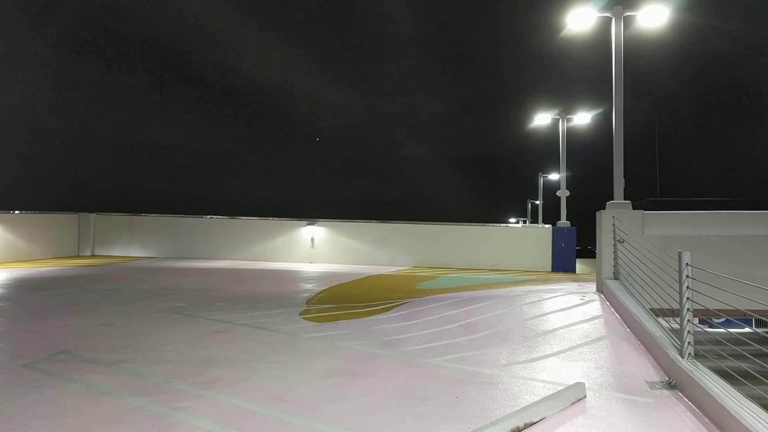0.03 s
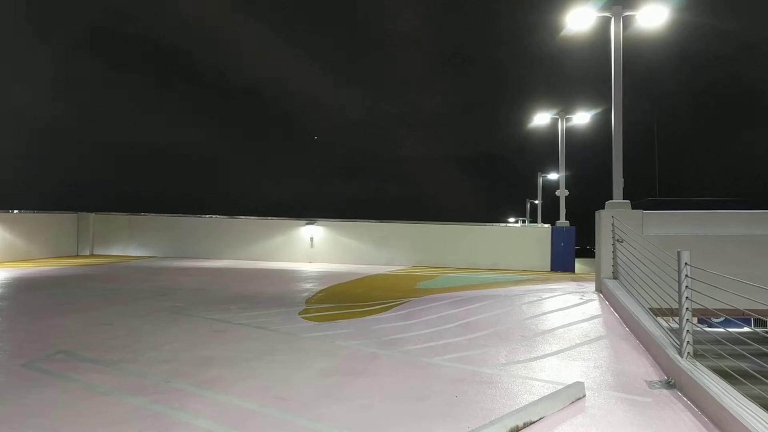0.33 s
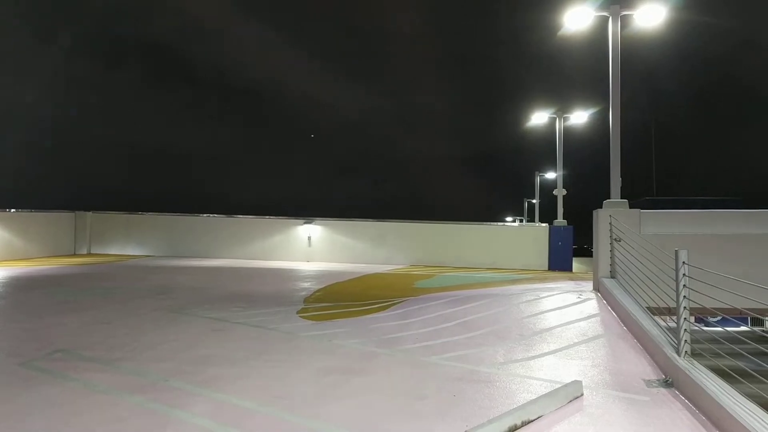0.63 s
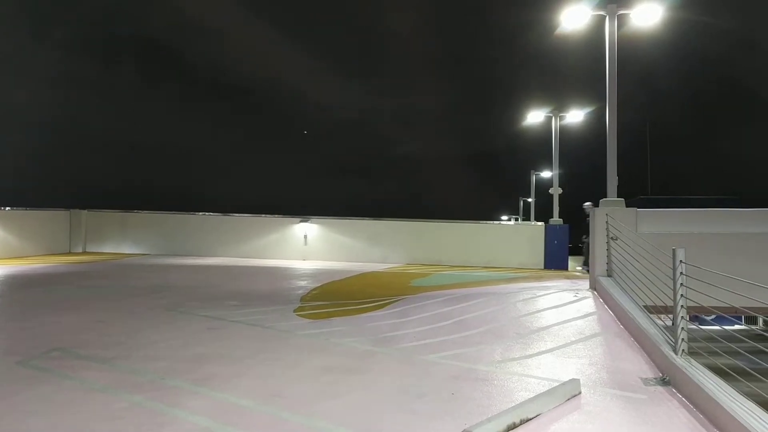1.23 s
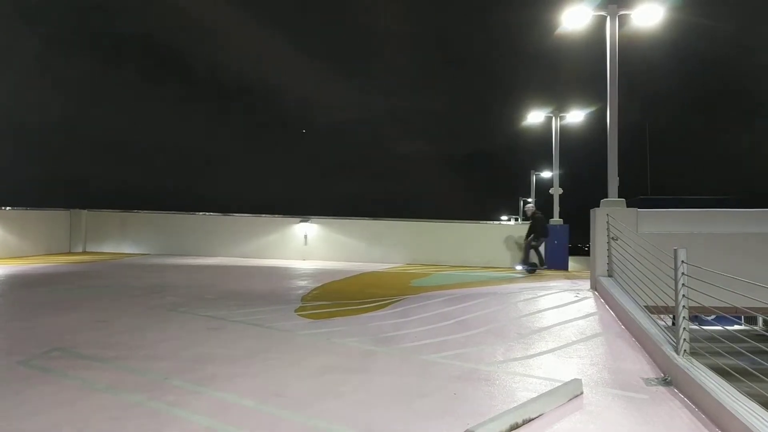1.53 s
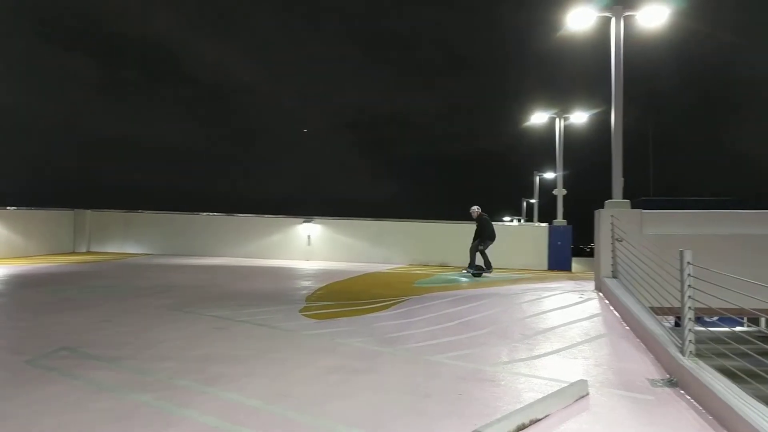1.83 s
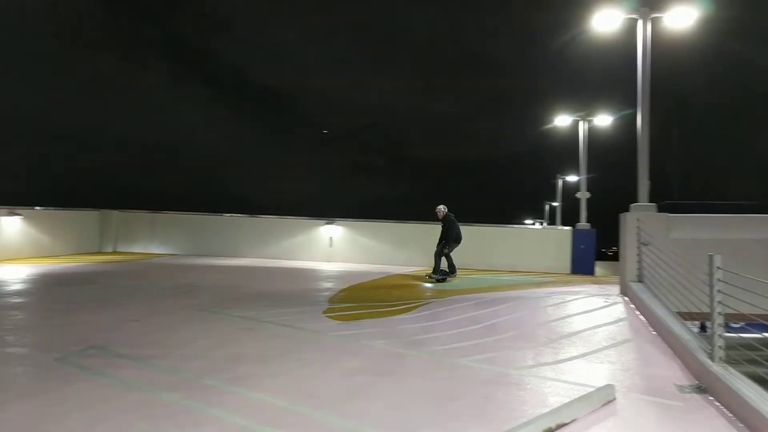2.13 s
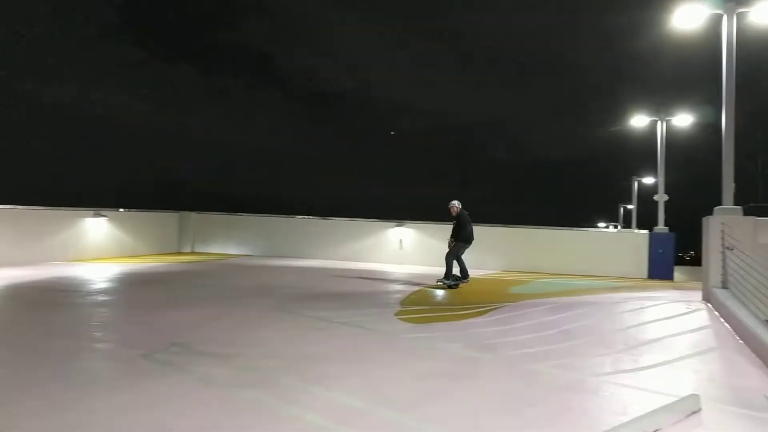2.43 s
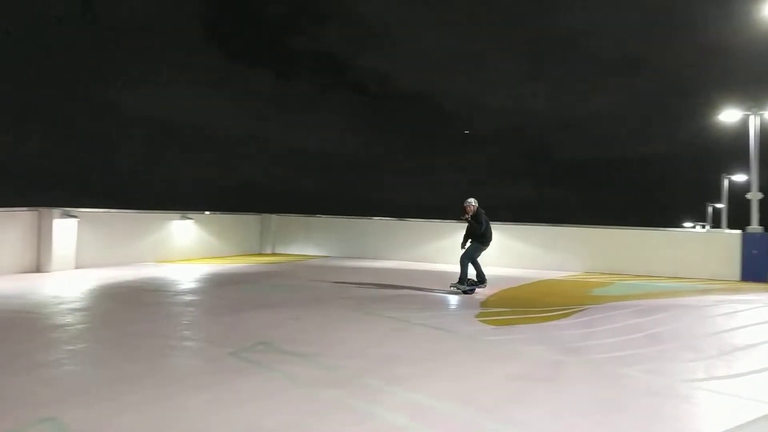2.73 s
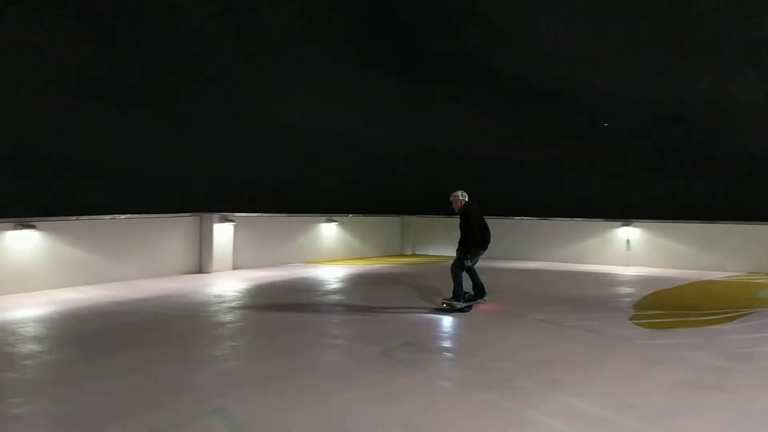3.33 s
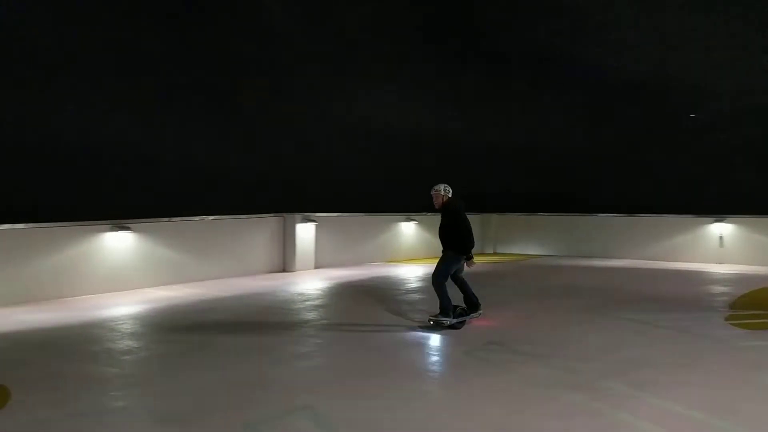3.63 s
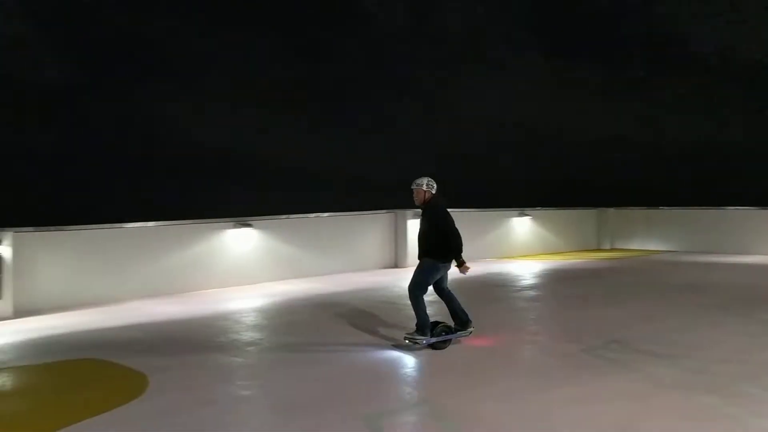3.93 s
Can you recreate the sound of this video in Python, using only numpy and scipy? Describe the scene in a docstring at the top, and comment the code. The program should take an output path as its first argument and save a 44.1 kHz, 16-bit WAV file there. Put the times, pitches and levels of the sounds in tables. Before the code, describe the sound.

Wind rumbles on the microphone while an electric skateboard rolls faintly closer over concrete.

```python
"""Wind rumbles right on the microphone, in soft buffets and a few sharp flaps, at night on an open
concrete parking deck. Behind it a rider on an electric board rolls closer from the far wall: the roar
of rubber on concrete grows and brightens, with a fine tread patter, crackles and scrapes of grit and a
thin motor whine. Far off lie a wash of traffic and faint steady whistles."""
import sys
import numpy as np
from scipy import signal
from scipy.io import wavfile
from scipy.ndimage import uniform_filter1d

SR = 44100
rng = np.random.default_rng(int(sys.argv[2]) if len(sys.argv) > 2 else 0)


def master_out(mix):
    """Clip the mix to full scale and print it as 16-bit PCM to the path in sys.argv[1]."""
    frames = np.transpose(np.atleast_2d(mix))
    ceiling = np.clip(frames, -1, 1)
    pcm = np.round(ceiling * 32767).astype(np.int16)
    wavfile.write(sys.argv[1], SR, pcm)


N = 176400
T = np.arange(N) / SR
LEAD_S = 1 / 8
EDDY_T = T[:SR // 4] - LEAD_S   # seconds from the middle of a buffet or flap


# Wind at the microphone. Each row: time in seconds, level in dB.
WIND_LEVEL = [(.12, -51), (.24, -39), (.48, -39.5), (.56, -35), (.70, -41), (.80, -39), (1.12, -32.5),
              (1.25, -39.5), (1.45, -36.5), (1.65, -35.5), (2.1, -34), (2.6, -34.5), (2.7, -31.5),
              (2.88, -37), (3.45, -35.5), (3.62, -27.5), (3.69, -44.5), (3.78, -32), (4.0, -39.5)]
# Its deep colour. Each row: frequency in Hz, level in dB per Hz.
WIND_SPECTRUM = [(22, -44.5), (32, -26.5), (45, -4), (62, 3), (110, -3), (190, -7), (300, -24.5),
                 (500, -27), (1000, -54.5)]

def rumble():
    """Air streams over the microphone: each band flutters, while their sum is evened out over 50 ms."""
    air = sum(band * from_db(2.5 * drift(22)) for _, band in noise_bands(WIND_SPECTRUM))
    power = uniform_filter1d(air ** 2, int(0.05 * SR)) + 1e-9
    return rms_one(air / np.sqrt(power)) * from_db(in_time(WIND_LEVEL))


# Eddies that hit the microphone. Each row: middle in seconds, relative level in dB, length in seconds,
# pitch of the thud in Hz.
EDDIES = [(0.246, -34, 0.042, 107), (0.282, -41, 0.032, 135), (0.541, -23.5, 0.049, 115.0),
          (0.598, -26.5, 0.051, 109.0), (0.65, -25.0, 0.033, 131), (0.725, -24.5, 0.017, 100),
          (0.802, -26.5, 0.064, 167.0), (0.868, -23, 0.018, 124.0), (0.918, -28, 0.021, 162),
          (0.999, -27, 0.028, 150), (1.033, -33.5, 0.073, 89.5), (1.119, -30, 0.078, 99),
          (1.328, -23.5, 0.022, 121.0), (1.37, -27.5, 0.022, 129), (1.654, -32, 0.018, 112),
          (1.828, -31, 0.021, 100), (1.905, -35, 0.043, 90), (2.067, -26.5, 0.039, 133),
          (2.246, -28.5, 0.032, 164), (2.339, -30, 0.024, 86), (2.556, -30.5, 0.036, 84),
          (2.701, -27, 0.033, 111), (2.8, -26.0, 0.022, 108.0), (2.929, -27.5, 0.033, 118),
          (3.016, -33, 0.053, 86.0), (3.104, -25.5, 0.022, 78), (3.271, -34, 0.051, 82.5),
          (3.42, -26.5, 0.019, 64), (3.513, -19.5, 0.017, 118), (3.565, -27.5, 0.032, 90),
          (3.605, -18.5, 0.024, 170), (3.743, -24, 0.018, 93), (3.824, -26, 0.015, 117)]
MIC_LOW_HZ, THUD_DB, THUD_CYCLES = 46.7, 8.5, 0.21

def buffets():
    """Each eddy is a puff of turbulence with a pressure pulse at its core."""
    out = np.zeros(N)
    for s, db, length_s, hz in EDDIES:
        air = puff(length_s, MIC_LOW_HZ, corner_hz=0.59 * hz, skirt_hz=299)
        eddy = rms_one(air + from_db(THUD_DB) * thud(hz)) * np.std(air)
        add(out, s - LEAD_S, from_db(db - 0.5) * eddy)
    return out


def puff(length_s, low_hz, corner_hz, skirt_hz):
    """A burst of turbulence on the microphone that rises faster than it falls."""
    slope_s = length_s * np.where(EDDY_T < 0, 0.62, 0.79)
    bell = 2 ** (-2 * (EDDY_T / slope_s) ** 2)
    air = cut(rng.standard_normal(len(EDDY_T)), low_hz, "high", order=3)
    air = cut(air, corner_hz, "low", order=1)
    air = cut(air, skirt_hz, "low", order=3)
    burst = cut(air * bell, 44, "high", order=3)
    return rms_one(burst) * np.sqrt(np.mean(bell ** 2))


def thud(hz):
    """One smooth push or pull on the microphone, ringing in its bass cut."""
    push = np.exp(-.5 * (EDDY_T * hz / THUD_CYCLES) ** 2)
    pulse = cut(push, MIC_LOW_HZ, "high", order=3)
    return rng.choice([-1, 1]) * pulse / np.abs(pulse).max()


# Sharp flaps of air on the microphone. Each row: middle in seconds, relative level in dB, half width
# of the pressure swing in seconds.
AIR_FLAPS = [(.606, -38, 0.00086), (.624, -27.5, 0.00077), (.637, -27, 0.0012), (.646, -28.5, 0.0012),
             (.721, -41, 0.00097), (.785, -31, 0.00051), (.792, -32.5, 0.0014), (.7975, -23.5, 0.00052),
             (.8005, -26, 0.00058), (.819, -29, 0.0018), (.911, -27, 0.00063), (.959, -32.5, 0.00069),
             (1.0, -25.5, 0.0011), (1.109, -31.5, .0009), (1.137, -36, 0.00086), (1.329, -27.5, 0.0013),
             (2.246, -27, 0.0016), (2.253, -23.5, 0.0009), (2.677, -31, 0.001), (2.797, -30, 0.0015),
             (3.595, -29.5, 0.00094), (3.602, -21.5, 0.00045), (3.62, -33, 0.0016)]

def flaps():
    """At the height of a gust, pressure snaps over to suction inside a small puff."""
    out = np.zeros(N)
    for s, db, half_width_s in AIR_FLAPS:
        widths = EDDY_T / half_width_s
        swing = -widths / (1 + (widths / 2) ** 2) ** 3
        snap = from_db(3) * swing / swing.max()
        air = from_db(-15) * puff(length_s=0.005, low_hz=225, corner_hz=446, skirt_hz=669)
        add(out, s - LEAD_S, from_db(db) * (snap + air))
    return out


# The tyre nears from the far wall; the roar dips briefly under the strongest gusts, around 0.55-0.9 s and at
# 3.6 s. Each row: time in seconds, relative level in dB.
APPROACH = [(.12, -59.5), (.25, -56), (.5, -56), (.56, -58), (.69, -59), (.76, -56), (.85, -59),
            (1.04, -55), (1.38, -56), (1.58, -53.5), (2.2, -52.5), (2.6, -52.5), (3.0, -51.5), (3.5, -50.5),
            (3.585, -52), (3.615, -55.5), (3.68, -54), (3.74, -52.5), (3.8, -52.5), (3.88, -51.5),
            (4.0, -49)]
# Its colour when the approach is at NEAR_DB. Each row: frequency in Hz, level in dB per Hz.
TYRE_SPECTRUM = [(150, -1.5), (350, 1.5), (600, 1), (1000, 2), (1300, -2.5), (1700, -2), (2400, -6.5),
                 (3300, -14.5), (5000, -23.5), (6500, -31), (8000, -36), (11000, -43), (14500, -39),
                 (16000, -38)]
NEAR_DB, TYRE_DB = -51.5, -47
BRIGHTENING = 0.51   # extra dB per octave for each dB that the board gains

def tyre(nearness_db):
    """Grainy roar of rubber on concrete, brighter as it nears the microphone."""
    grain_db = 0.93 * drift(35)
    roar = np.zeros(N)
    for hz, band in noise_bands(TYRE_SPECTRUM):
        octaves = np.clip(np.log2(hz / 860), -1, 1)
        roar += band * from_db(nearness_db * (1 + BRIGHTENING * octaves))
    return roar * from_db(TYRE_DB + grain_db)


# Grit scraping on the deck. Each row: start in seconds, level of the rasp in dB, decay in seconds,
# pitch of the rasp in Hz, treble hiss against the rasp in dB.
GRIT_SCRAPES = [(2.331, -67, .004, 7460, -5), (2.363, -56.5, .007, 6000, -18),
                (2.383, -63.5, 0.011, 7960, -22), (2.481, -74, .003, 9000, -3),
                (2.515, -55.5, .0025, 4900, -11), (2.540, -69, .003, 7500, -12),
                (2.667, -66, .003, 5500, -10), (3.052, -65.5, .005, 6500, -14),
                (3.175, -71.5, .003, 7500, -12), (3.291, -64, .004, 13300, -8),
                (3.342, -52, .004, 6000, -20), (3.343, -55, .003, 13800, -1), (3.373, -66, .004, 8000, -9),
                (3.402, -56.5, 0.0028, 5800, -6), (3.409, -48, 0.0023, 3900, -15),
                (3.42, -59, 0.0055, 5860, -16), (3.445, -61.5, 0.018, 4140, -20),
                (3.483, -60.5, .004, 5460, -8), (3.553, -67.5, .003, 6960, -6),
                (3.699, -75, .002, 8000, -8), (3.807, -74, .002, 7500, -12), (3.852, -69, .003, 7000, -10)]
SCRAPE_ATTACK_S, BOARD_RING_HZ = .002, 3300

def scrapes():
    """Short rasps of grit: a broad resonance, a little hiss and the board's own ring."""
    out, t = np.zeros(N), T[:SR // 8]
    for s, db, decay_s, hz, hiss_db in GRIT_SCRAPES:
        rub = rng.standard_normal((3, len(t)))
        width_hz = .6 * min(hz, 8000)
        rasp = rms_one(resonate(resonate(rub[0], hz, width_hz), hz, width_hz))
        ring = rms_one(cut(rub[1], [BOARD_RING_HZ / np.sqrt(2), BOARD_RING_HZ * np.sqrt(2)], "band"))
        hiss = from_db(hiss_db) * cut(rub[2], 2480, "high")
        rise = np.minimum(t / SCRAPE_ATTACK_S, 1)
        fall = np.exp(-np.maximum(t - 2 * SCRAPE_ATTACK_S, 0) / decay_s)
        add(out, s, from_db(db) * rise * fall * (rasp + from_db(-3) * ring + hiss))
    return out


def grit(nearness_db, grains_per_s=35, decay_s=.002):
    """Loose grains crackle faintly under the tyre, louder as it comes closer."""
    hits = rng.random(N) < grains_per_s / SR
    grains = hits * from_db(3 * np.minimum(rng.exponential(1, N), 3))
    decays = signal.lfilter([1], [1, -np.exp(-1 / (decay_s * SR))], grains + 1e-18)
    hiss = rms_one(cut(rng.standard_normal(N), [4500, 10000], "band", order=1))
    return decays * hiss * from_db(-80 + 1.8 * nearness_db)


# Tread patter from across the deck. Each row: time in seconds, level in dB.
PATTER_LEVEL = [(.12, -102), (1.25, -91.5), (1.5, -86), (1.8, -85), (2.1, -92), (2.45, -92), (2.62, -81),
                (2.9, -88), (3.4, -84), (3.65, -98.5), (4.0, -78)]

def patter(ticks_per_s=47, sharpness=3.5):
    """The turning tyre ticks in a fast run of tiny hisses, some stronger than others."""
    ticks = np.exp(sharpness * np.cos(2 * np.pi * ticks_per_s * T))
    ticks *= from_db(2 * drift(20))
    hiss = cut(rng.standard_normal(N), [9500, 14900], "band")
    return rms_one(ticks * hiss) * from_db(in_time(PATTER_LEVEL))


# The motor's two tones. Each row: pitch in Hz, waver in Hz, relative level in dB.
MOTOR_TONES = [(14240, 14, -3), (14882, 28, -5)]
# Their strength at the microphone. Each row: time in seconds, gain in dB.
MOTOR_LEVEL = [(1.5, -105), (2.3, -92), (2.85, -90), (3.08, -78), (3.25, -82), (3.52, -87), (3.66, -98),
               (3.95, -75)]

def motor():
    """The electric motor's thin whine swells and fades, very high up."""
    return thin_tones(MOTOR_TONES) * from_db(in_time(MOTOR_LEVEL))


# Traffic far beyond the deck. Each row: frequency in Hz, level in dB per Hz.
TRAFFIC_SPECTRUM = [(100, 0.5), (400, 2), (950, 0), (1500, -4.5), (3000, -34), (6000, -42), (10000, -39.5),
                    (16000, -50.5)]

def traffic(level_db=-55):
    """Distant vehicles blend into one even wash."""
    return from_db(level_db) * sum(band for _, band in noise_bands(TRAFFIC_SPECTRUM))


# Whistles in the far background. Each row: pitch in Hz, waver in Hz, relative level in dB.
FAR_WHISTLES = [(7260, 60, -89.5), (11700, 12, -98), (14520, 110, -93.5)]

def whistles():
    """Faint high tones hang steadily over the town."""
    return thin_tones(FAR_WHISTLES)


def thin_tones(rows, flutter_db=2.4):
    """Narrow tones that waver in pitch and level."""
    out = np.zeros(N)
    for hz, waver_hz, db in rows:
        gain = np.sqrt(2) * from_db(db - 1 + flutter_db * drift(25))
        phase = 2 * np.pi * np.cumsum(hz + waver_hz * drift(91)) / SR
        out += gain * np.sin(phase)
    return out


def noise_bands(colour):
    """Third-octave bands of noise in a given colour, as (Hz, band); together they have unit power."""
    points_hz, points_db = np.transpose(colour)
    edges = 20 * 2 ** (np.arange(30) / 3)
    white, bands = rng.standard_normal((2, N)), []
    for k, (low, high) in enumerate(zip(edges, edges[1:])):
        hz = np.sqrt(low * high)
        db = np.interp(np.log(hz), np.log(points_hz), points_db, left=-np.inf, right=-np.inf)
        if np.isfinite(db):
            bands.append((hz, from_db(db) * cut(white[k % 2], [low, high], "band", order=3)))
    total = np.std(sum(band for _, band in bands))
    return [(hz, band / total) for hz, band in bands]


def drift(rate_hz):
    """A smooth random wander with spread 1."""
    hop, settle = 40, 2000
    r = np.exp(-2 * np.pi * rate_hz * hop / SR)
    steps = rng.standard_normal(N // hop + settle + 2)
    slow = signal.lfilter([1], [1, -2 * r, r * r], steps)[settle:]
    return np.interp(np.arange(N) / hop, np.arange(len(slow)), rms_one(slow))


def resonate(x, hz, width_hz):
    """One resonance."""
    r = np.exp(-np.pi * width_hz / SR)
    return signal.lfilter([1, 0, -1], [1, -(1 + r * r) * np.cos(2 * np.pi * hz / SR), r * r], x)


def cut(x, hz, kind, order=2):
    """Butterworth filter."""
    return signal.sosfilt(signal.butter(order, hz, kind, fs=SR, output="sos"), x)


def from_db(db):
    """Decibels to gain."""
    return 10 ** (np.asarray(db) / 20)


def rms_one(x):
    """Scale to unit power."""
    return x / np.sqrt(np.mean(x ** 2) + 1e-20)


def in_time(rows):
    """Join (seconds, value) points by straight lines."""
    return np.interp(T, *np.transpose(rows))


def add(out, s, sound):
    """Mix a sound in from time s."""
    i = max(int(s * SR), 0)
    out[i:i + len(sound)] += sound[:max(N - i, 0)]


def scene():
    """One microphone on the deck: wind right on it, the board behind, the town far off."""
    nearness_db = in_time(APPROACH) - NEAR_DB
    board = tyre(nearness_db) + patter() + grit(nearness_db) + scrapes() + motor()
    town = traffic() + whistles()
    wind = cut(rumble() + buffets() + flaps(), 36, "high", order=6)
    return (wind + board + town)[None]


def record(dry):
    """The sound cuts in quickly at 0.12 s; the top is cut off steeply at 15850 Hz."""
    opened = dry * np.clip((T - 0.12) / 0.0072, 0, 1)
    return signal.sosfilt(signal.ellip(10, .2, 80, 15850, fs=SR, output="sos"), opened)


dry = scene()
out = record(dry)
master_out(out)
```